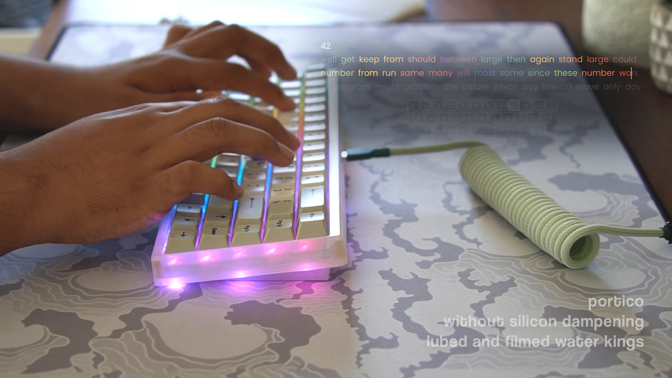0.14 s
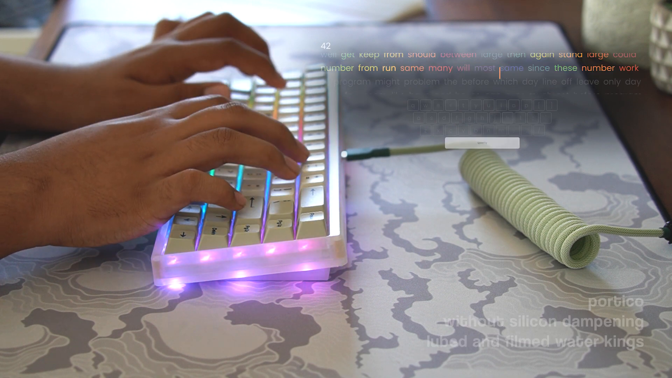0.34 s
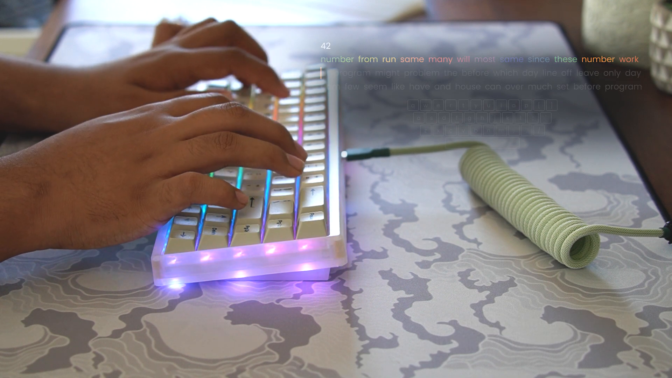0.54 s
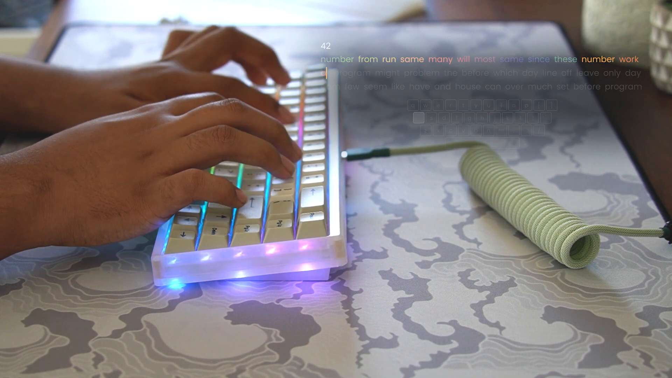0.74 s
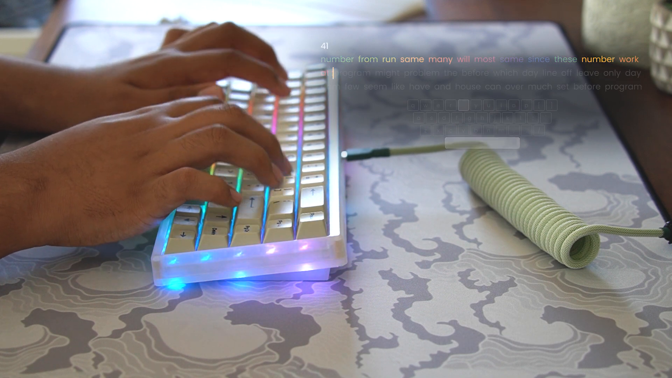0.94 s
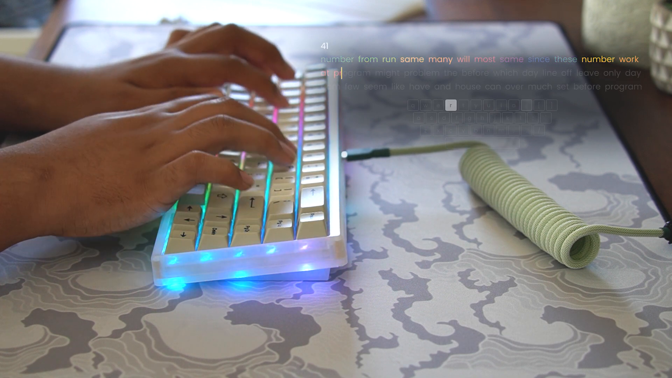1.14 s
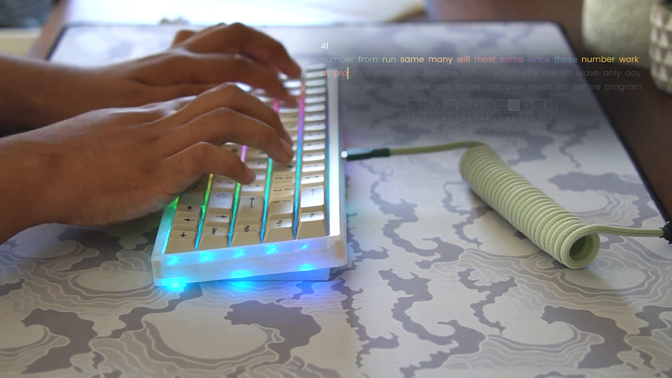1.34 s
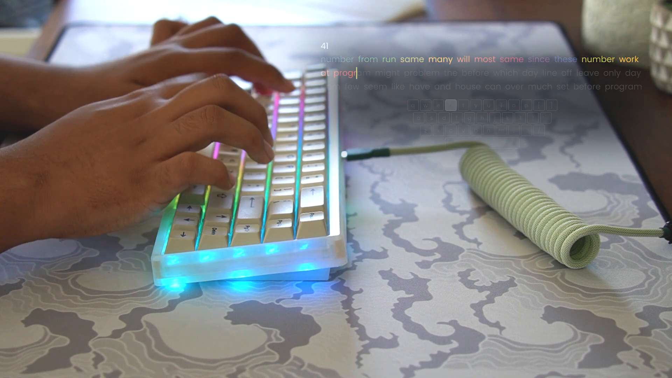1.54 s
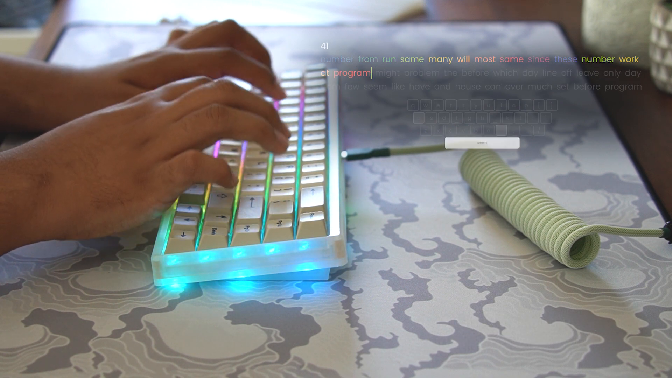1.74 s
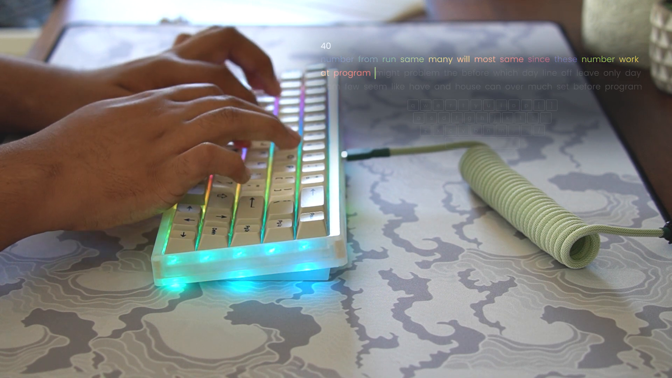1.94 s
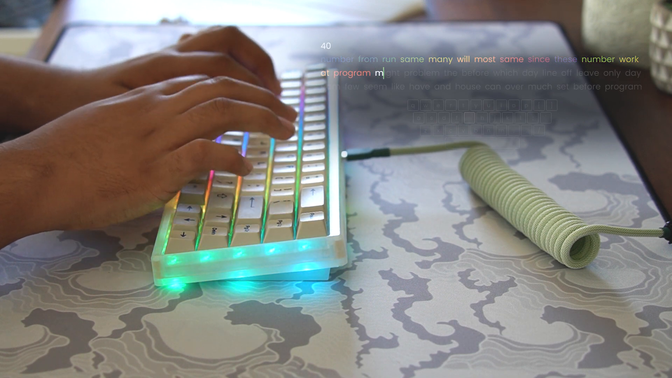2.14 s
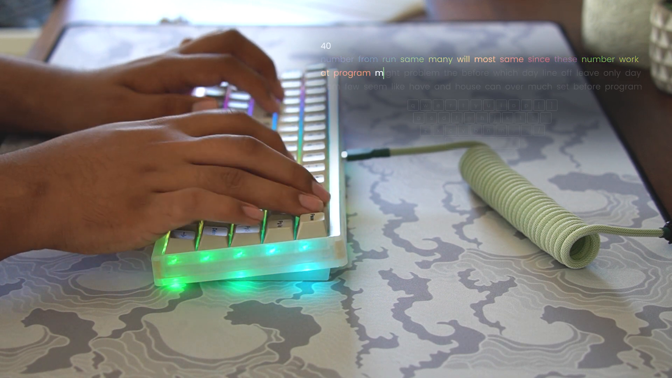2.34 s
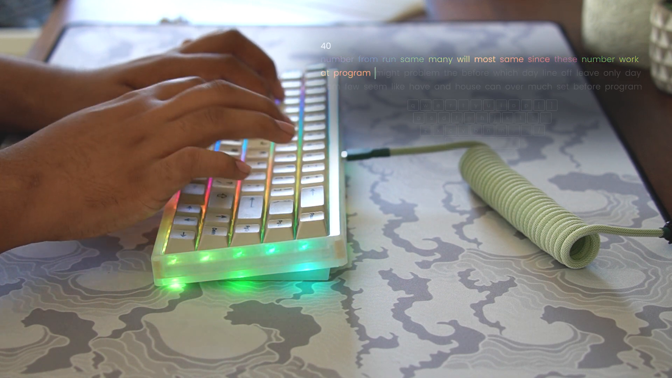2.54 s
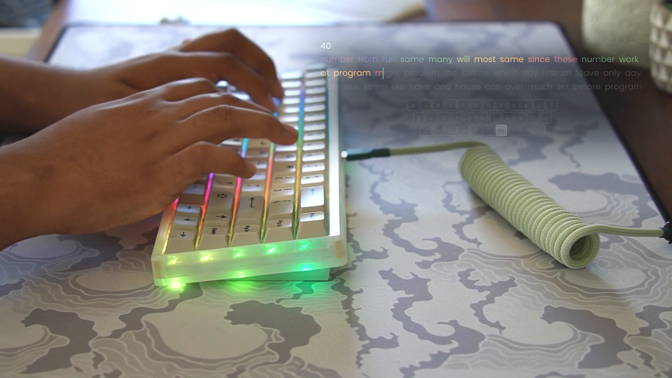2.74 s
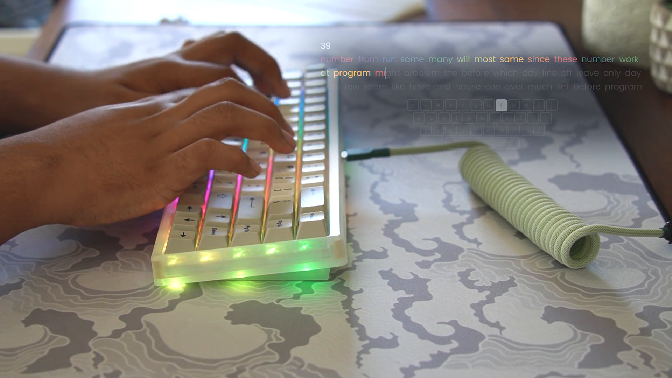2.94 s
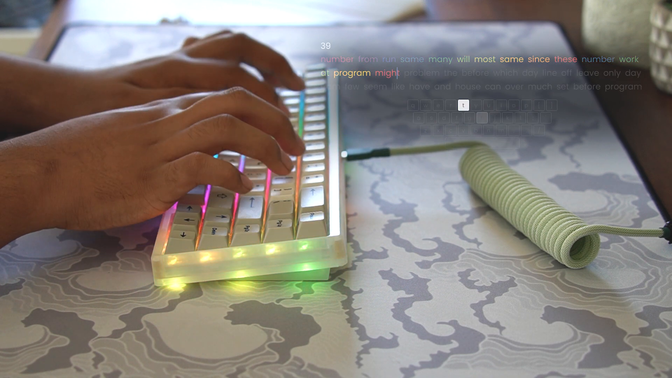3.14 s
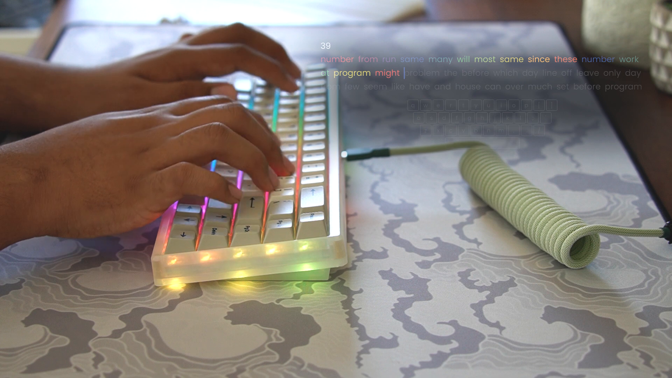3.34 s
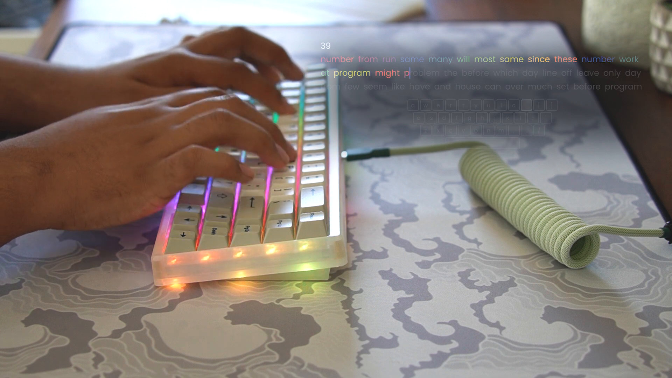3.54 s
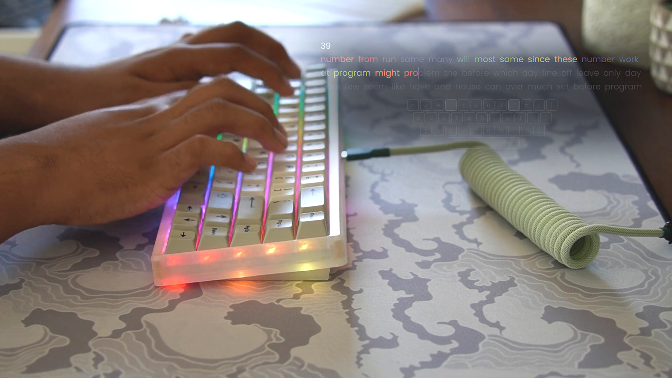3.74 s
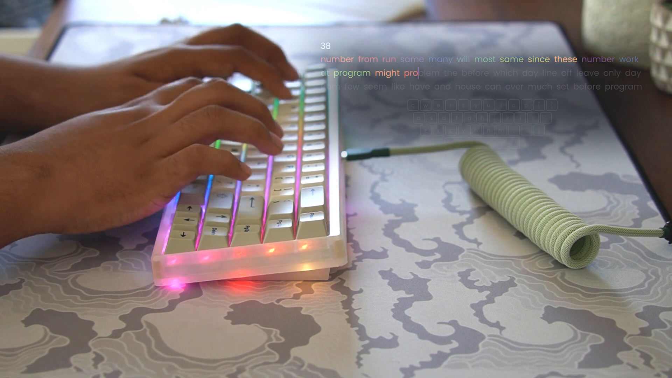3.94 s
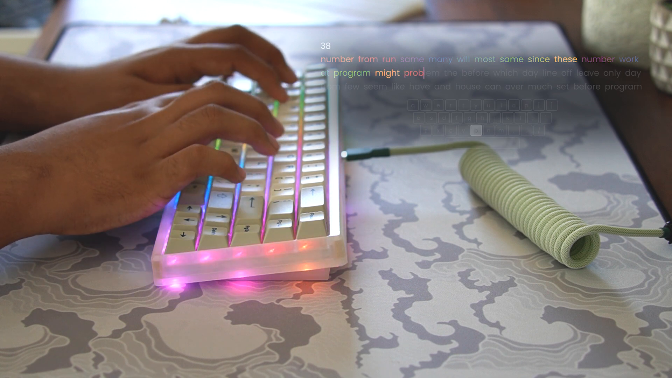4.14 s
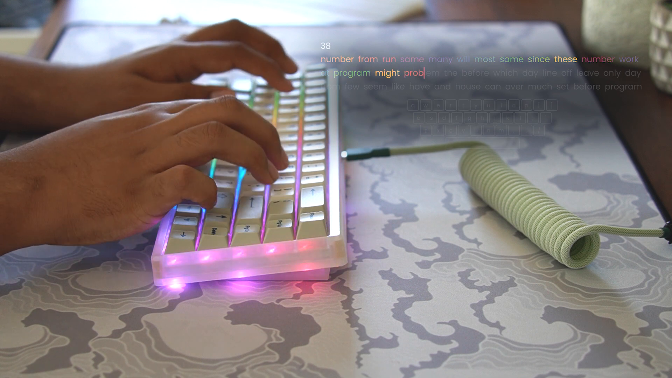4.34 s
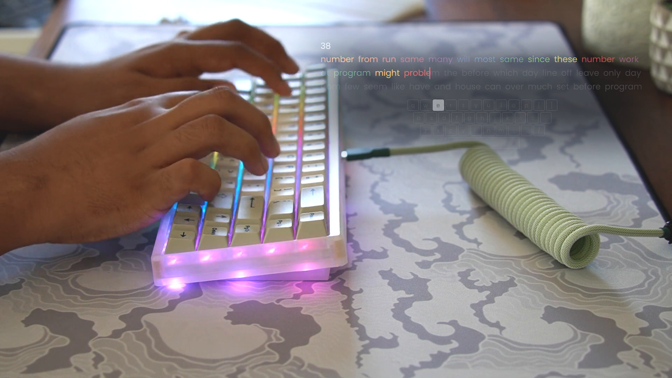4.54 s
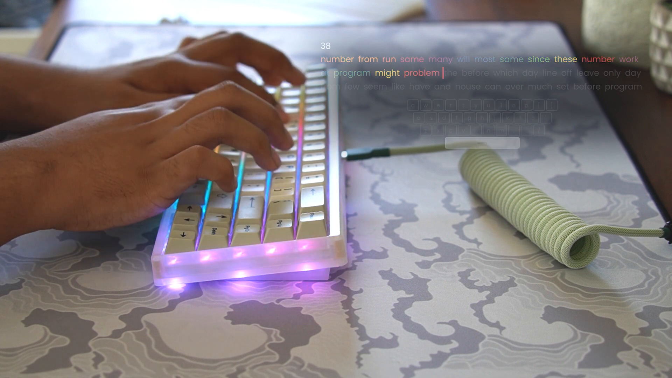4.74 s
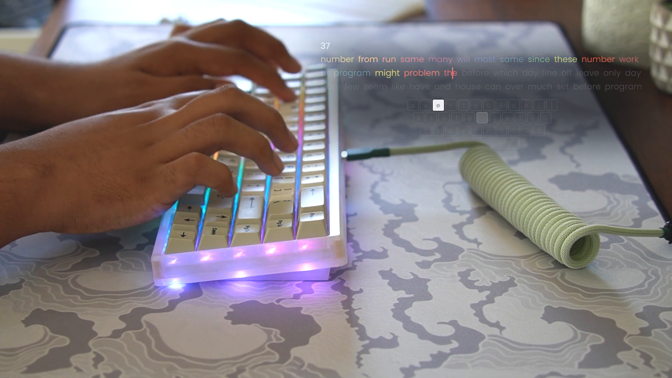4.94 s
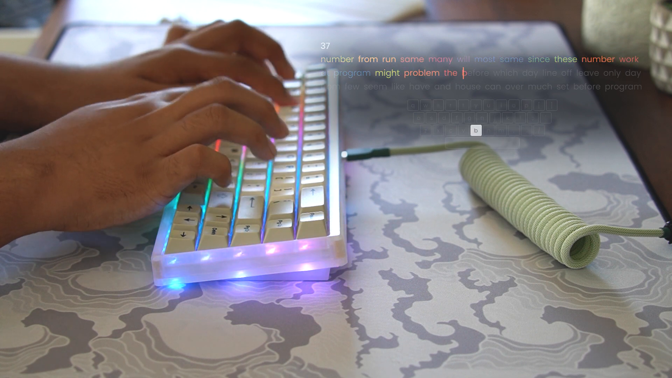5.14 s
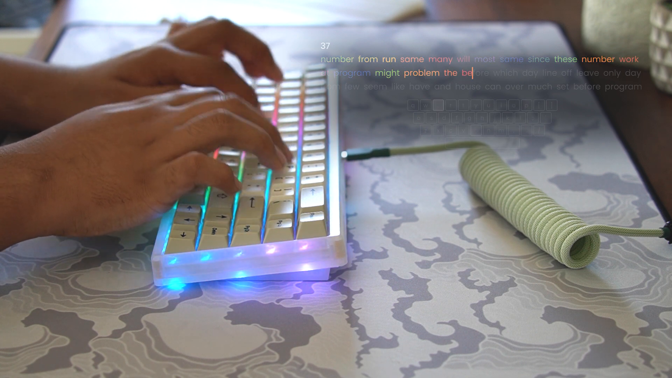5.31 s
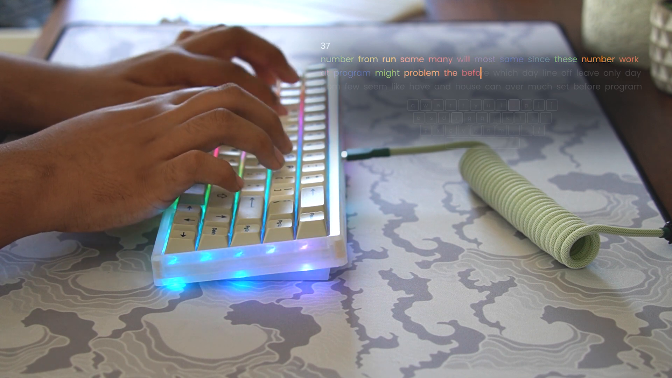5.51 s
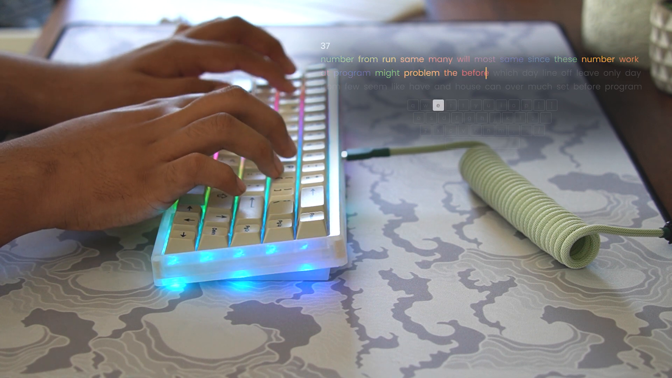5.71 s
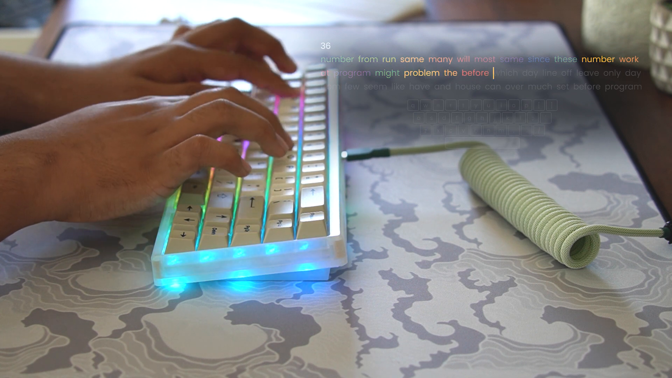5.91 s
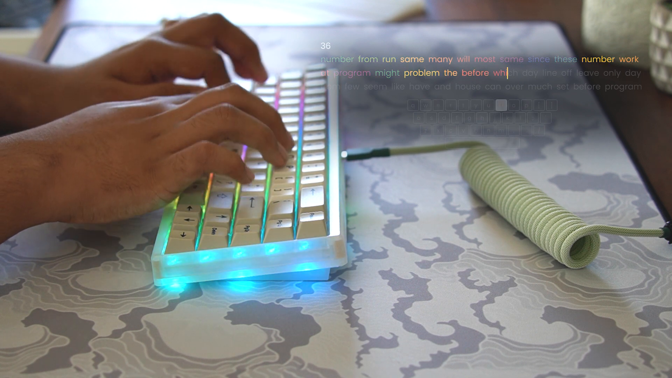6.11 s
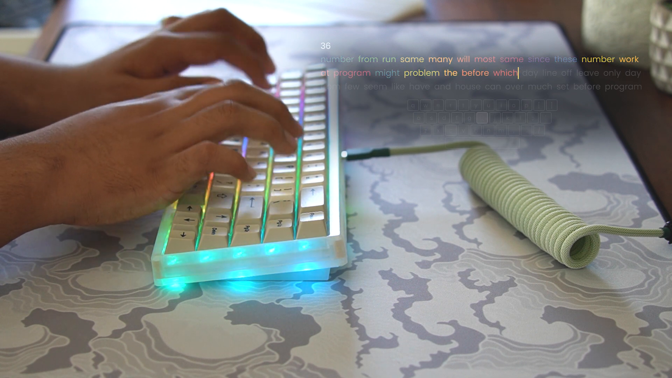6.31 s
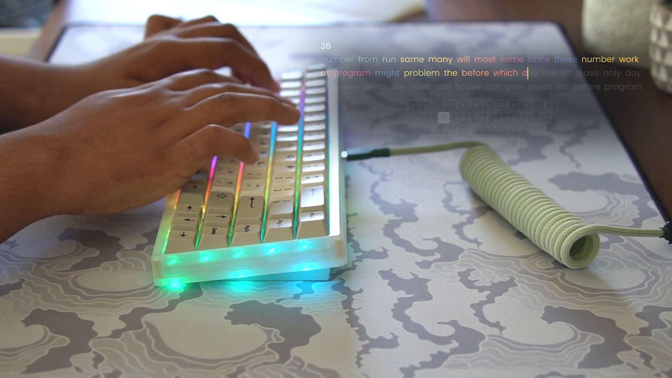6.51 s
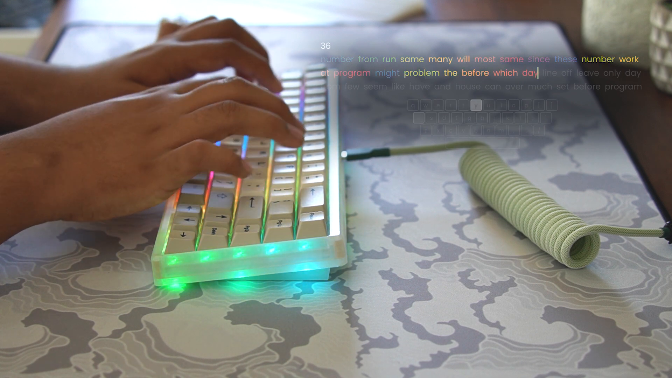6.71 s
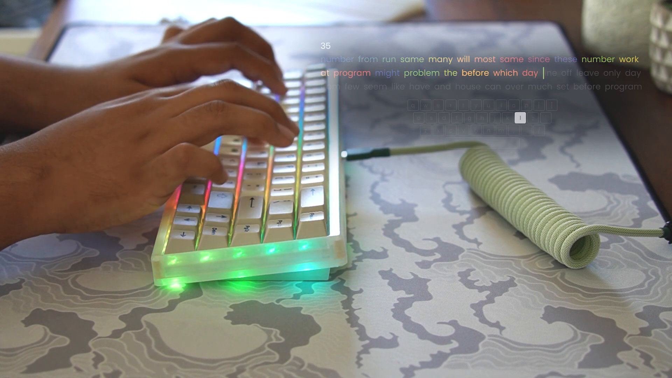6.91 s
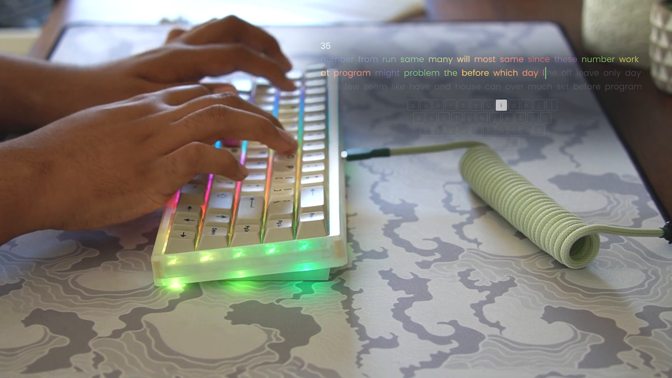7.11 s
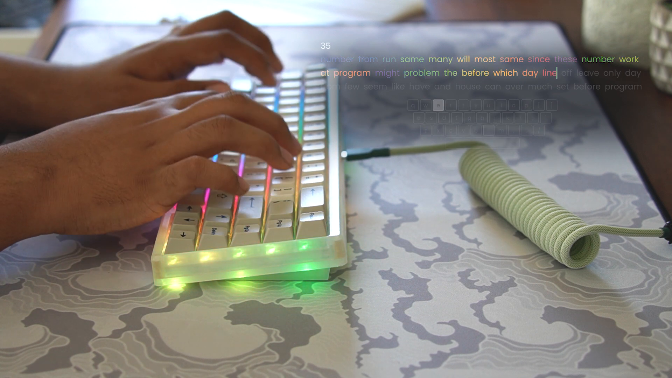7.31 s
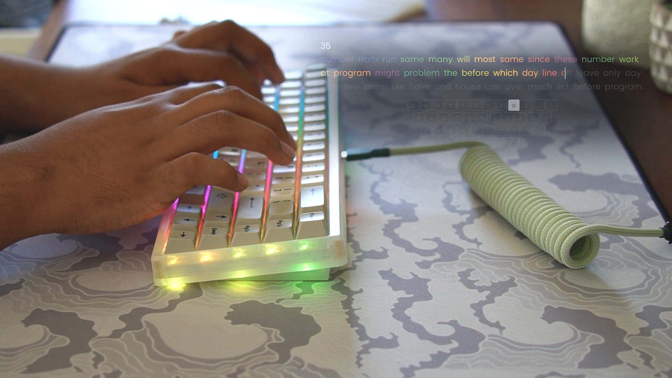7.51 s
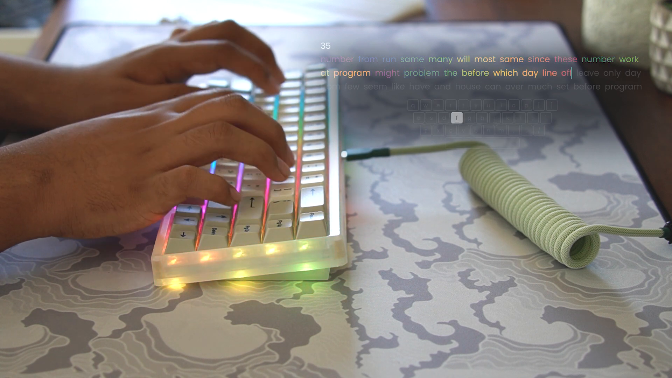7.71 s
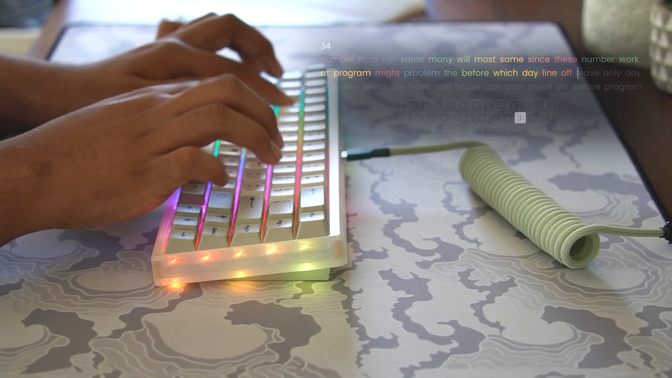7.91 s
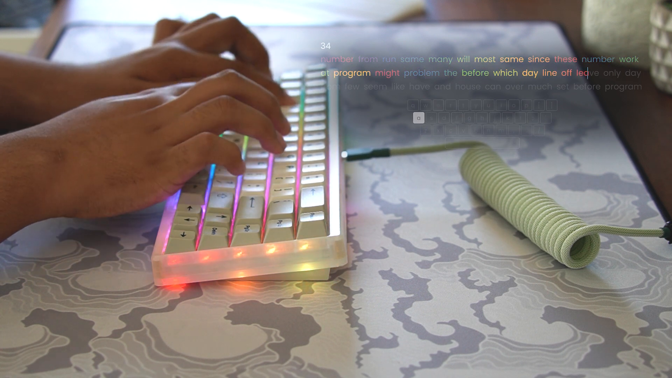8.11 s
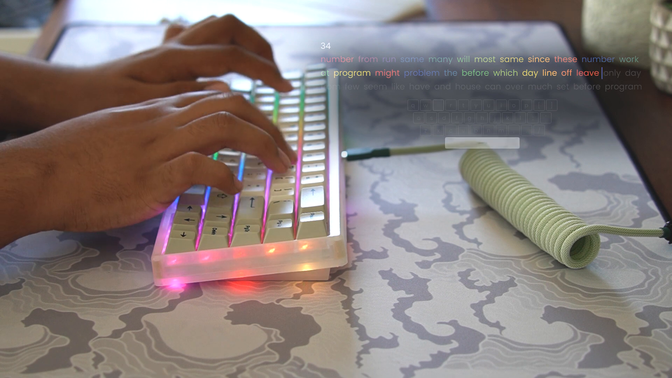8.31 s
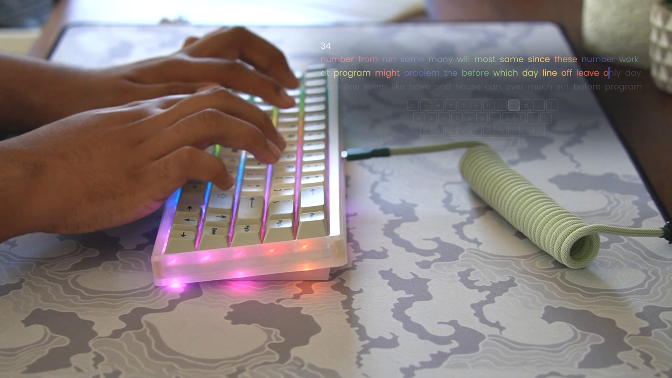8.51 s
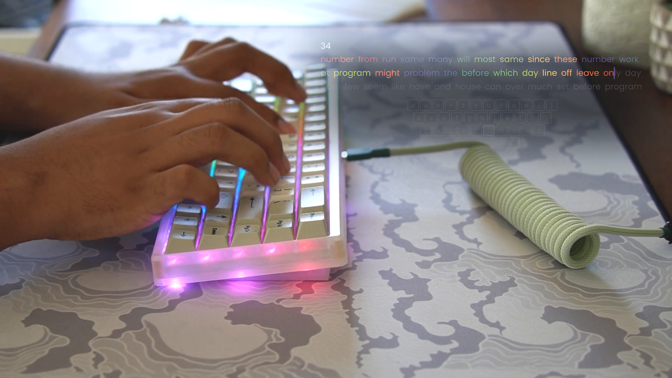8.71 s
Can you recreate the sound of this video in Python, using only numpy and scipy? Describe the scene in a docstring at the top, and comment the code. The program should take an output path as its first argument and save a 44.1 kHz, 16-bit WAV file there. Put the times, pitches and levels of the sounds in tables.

```python
"""Fast typing on a mechanical keyboard with a hollow plastic case, heard up close.
Keycaps clack as they bottom out and spring back, the long bar knocks lower: struck modes plus chatter.
Faint soft contacts, brushes and weak key blows alike, are short noisy scrapes through cap and stem modes.
The desk thumps under the blows; a quiet room hums, rumbles, hisses and throws back a faint echo."""
import sys
import numpy as np
from scipy import signal
from scipy.fft import rfft, irfft
from scipy.io import wavfile

SR = 44100
rng = np.random.default_rng(int(sys.argv[2]) if len(sys.argv) > 2 else 0)


def waveform_to_disk(signal):
    """Save audio, clipped to [-1, 1], as 16-bit WAV at the path in sys.argv[1]."""
    frames = np.transpose(np.atleast_2d(signal))
    scaled = np.clip(frames, -1, 1) * 32767
    samples = np.round(scaled).astype(np.int16)
    wavfile.write(sys.argv[1], SR, samples)


N = 386312

# modes of a keycap in its case: (factor on the cap pitch, width/Hz, level/dB)
CAP_MODES = [(0.402, 227, -5.5), (0.622, 730, -4.5), (0.953, 522, 7), (1.086, 340, 9), (1.251, 500, 0.14)]
# modes of stem and housing: (f/Hz, width/Hz, level/dB)
STEM_MODES = [(6616, 640, 1.5), (8500, 380, -4.5), (10260, 1130, 5.5), (12000, 5800, 1.5),
              (14700, 630, -15)]


def gain_of(db):
    """Decibels to an amplitude factor."""
    return 10 ** (np.asarray(db) / 20)


def read(points, hz):
    """Reads a spectrum on a logarithmic frequency axis."""
    f, value = np.transpose(points)
    return np.interp(np.log(hz + 1), np.log(f + 1), value)


def add(mix, s, sound):
    """Adds a sound to the mix at s seconds."""
    part = mix[round(s * SR):][:len(sound)]
    part += sound[:len(part)]


def ring(hz, width, db, contact_s, size=700):
    """Modes struck together, wider ones dying faster; contact_s sets how softly they start; peak 1."""
    t = np.arange(size)[:, None] / SR
    decay = np.exp(-np.pi * width * t)
    modes = (gain_of(db) * width * decay * np.sin(2 * np.pi * hz * t)).sum(1)
    modes *= (1 - np.exp(-t[:, 0] / contact_s)) ** 2  # the force builds up while the plastic yields
    return modes / abs(modes).max()


def chatter(sound, grit):
    """The blow, then loose plastic chattering: a fading burst of tiny irregular re-strikes; peak kept."""
    fade = np.exp(-np.arange(len(grit)) / (0.003 * SR))  # 3 ms time constant
    strikes = gain_of(-43) * grit ** 3 * fade  # cubing makes a few re-strikes stand out
    strikes[0] = 1  # the blow itself
    rattled = signal.oaconvolve(sound, strikes)
    return rattled * abs(sound).max() / abs(rattled).max()


def keys():
    """Each blow clacks at its own pitch, with a thin stem and housing tick that varies from blow to blow."""
    # keycap blows, down and up: (t/s, level/dB, cap pitch f/Hz, stem tick relative to the clack level/dB)
    key_blows = [(0.0639, -28.5, 3000, -22), (0.073, -35, 2820, -13), (0.222, -35.5, 2660, -21),
                 (0.2387, -27, 2890, -16.5), (0.6457, -22, 2880, -30.5), (0.725, -32, 2380, -21),
                 (0.8173, -21, 2800, -16), (0.8838, -27, 2820, -15.5), (1.0247, -28, 2620, -12),
                 (1.107, -30, 2500, -13), (1.115, -26.5, 3260, -3), (1.2051, -31, 2900, -14),
                 (1.2898, -38.5, 2640, -33), (1.455, -24.5, 2870, -11), (1.4583, -34, 2900, -4),
                 (1.5352, -32, 2770, -15), (1.618, -22.5, 2720, -15.5), (1.6295, -38, 2600, -8),
                 (1.6438, -25.5, 3000, -4), (1.701, -37.5, 2430, -3.5), (1.736, -35.5, 2860, -18),
                 (1.877, -37.5, 2830, -3), (2.003, -35.5, 2440, -15), (2.0716, -27, 2900, -11),
                 (2.423, -36.5, 2670, -14), (2.4979, -29, 2430, -20.5), (2.677, -29, 3040, -6.5),
                 (2.778, -25, 2890, -17.5), (2.903, -24, 2840, -15), (2.969, -26, 2570, -17),
                 (3.0349, -23, 2580, -9.5), (3.1209, -31, 3040, -16), (3.1397, -21.5, 2680, -4.5),
                 (3.216, -33.5, 2900, -11), (3.42, -30, 2630, -14), (3.4974, -32, 2700, -14.5),
                 (3.7036, -33, 2720, -20), (3.7096, -32, 2580, -9.5), (4.085, -31, 2930, -8),
                 (4.3852, -42, 2760, -10), (4.455, -18, 2850, -8), (4.5087, -30, 2690, -8),
                 (4.5762, -20.5, 2970, -5), (4.5824, -29, 2600, -12), (4.6483, -32, 2940, -16),
                 (4.7792, -27.5, 2800, -16), (4.8512, -29, 2670, -12), (4.8546, -21, 2850, -6.5),
                 (4.9309, -21.5, 2870, -20), (4.951, -30, 2700, -4), (5.0253, -34.5, 2450, -9),
                 (5.1444, -25.5, 2860, -10.5), (5.2012, -26, 2590, -4), (5.271, -22, 2710, -8.5),
                 (5.3772, -22, 2920, -7.5), (5.3979, -24.5, 2730, -13), (5.4437, -21, 2950, -4),
                 (5.4826, -35, 2760, -15), (5.5341, -29.5, 3140, -5), (5.6057, -37.5, 2550, -14),
                 (5.7011, -27, 2620, -7), (5.776, -25.5, 2760, -3), (5.9291, -22, 2980, -10),
                 (6.0194, -26.5, 2760, -22), (6.0334, -32, 2710, 3), (6.047, -22, 2940, -26),
                 (6.1464, -16, 3100, -10.5), (6.1832, -35, 2750, -14), (6.234, -35, 2700, -12.5),
                 (6.4269, -28.5, 2830, -6.5), (6.5113, -30.5, 2700, -16), (6.569, -17.5, 2780, -13),
                 (6.627, -23.5, 2690, -15), (6.6657, -39, 2550, -11), (6.697, -36, 2770, -12),
                 (6.8947, -25, 2820, -11.5), (6.976, -27, 2860, -5.5), (7.087, -25, 2900, -13.5),
                 (7.1802, -18, 3140, -21.5), (7.2454, -35, 2650, -10), (7.2682, -27, 2880, -25),
                 (7.321, -27, 2500, -4), (7.46, -26.5, 2600, -16), (7.5291, -24, 3090, -9.5),
                 (7.536, -33, 2850, -14), (7.598, -23, 3000, -2), (7.6629, -22.5, 3090, -3.5),
                 (7.7344, -22, 2980, -4.5), (7.883, -24.5, 2780, -6), (7.9282, -26, 2580, -10),
                 (7.975, -29, 2870, -9), (8.0697, -29.5, 2600, -38), (8.1237, -17, 2970, -11.5),
                 (8.1562, -37, 2560, -31), (8.166, -26, 2640, -9.5), (8.1964, -27.5, 2890, -11),
                 (8.2577, -28.5, 2470, -3.5), (8.402, -26.5, 2980, -12), (8.487, -32.5, 2670, -13.5),
                 (8.574, -27.5, 2820, -22), (8.621, -27, 2860, -20.5), (8.7263, -29.5, 2910, -16)]
    cap_spread, cap_spread_db = 0.015, 2.2  # blow-to-blow scatter of the cap modes: share of pitch, dB
    stem_spread, stem_spread_db = 0.03, 3.5  # the same for the stem modes
    cap_contact_s, stem_contact_s = 2 / SR, 0.00016
    case_cut_hz = 580  # the small caps radiate little below this

    factor, width, db = np.transpose(CAP_MODES)
    tick_hz, tick_width, tick_db = np.transpose(STEM_MODES)
    factor = factor * (-1) ** np.arange(len(CAP_MODES))  # neighbouring modes swing in opposite phase
    chance = rng.standard_normal((len(key_blows), 4, len(CAP_MODES)))
    grits = rng.standard_normal((len(key_blows), 200))
    out = np.zeros(N)
    for (s, level_db, cap_hz, stem_db), c, grit in zip(key_blows, chance, grits):
        clack_hz = cap_hz * factor * (1 + cap_spread * c[0])
        clack = ring(clack_hz, width, db + cap_spread_db * c[1], cap_contact_s)
        scattered_hz = tick_hz * (1 + stem_spread * c[2])
        tick = ring(scattered_hz, tick_width, tick_db + stem_spread_db * c[3], stem_contact_s)
        blow = clack + gain_of(stem_db) * tick
        add(out, s, -gain_of(level_db) * chatter(blow, grit))
    return signal.sosfilt(signal.butter(3, case_cut_hz, "high", fs=SR, output="sos"), out)


def bar():
    """The long bar rings the same lower modes at every blow, in slightly varying balance."""
    # long bar blows: (t/s, level/dB)
    bar_blows = [(0.3601, -39.5), (0.889, -31), (1.7397, -25), (3.1987, -26), (4.706, -22.5), (5.0131, -22),
                 (5.7786, -21), (6.3076, -19), (6.73, -19.5), (7.3293, -21.5), (7.738, -23), (8.263, -21.5)]
    # modes of the long bar: (f/Hz, width/Hz, level/dB)
    bar_modes = [(313, 74, -2.5), (704, 120, -15), (1275, 133, -3), (1766, 420, 1.5), (2126, 143, 8),
                 (2640, 320, -12), (3026, 210, 0.5), (3150, 83, -15), (4040, 58, -5.5), (6830, 460, -15.5),
                 (11150, 1200, -18)]
    spread_db = 1.5  # scatter of the mode levels

    hz, width, db = np.transpose(bar_modes)
    chance = rng.standard_normal((len(bar_blows), len(hz)))
    grits = rng.standard_normal((len(bar_blows), 200))
    out = np.zeros(N)
    for (s, level_db), c, grit in zip(bar_blows, chance, grits):
        knock = ring(hz, width, db + spread_db * c, contact_s=0.00013, size=2000)
        add(out, s, gain_of(level_db) * chatter(knock, grit))
    return out


def soft_contacts():
    """Short noisy scrapes ring cap and stem modes softly: faint contacts and a random scatter of specks."""
    # faint soft contacts, brushes and weak key blows alike: (t/s, scrape level/dB)
    contacts = [(0.171, -64.5), (0.288, -59), (0.465, -61.5), (1.8375, -62.5), (2.131, -66), (2.657, -64),
                (3.292, -63), (3.634, -58.5), (3.9429, -63.5), (4.225, -61), (4.36, -65.5), (4.567, -56),
                (4.668, -63), (4.762, -61.5), (4.7954, -64), (4.979, -56), (5.186, -61), (5.218, -54.5),
                (5.363, -56), (5.515, -63), (5.87, -60.5), (6.0905, -57.5), (6.134, -54), (6.411, -59.5),
                (6.8243, -57), (7.2966, -54), (7.516, -51.5), (7.6436, -60), (7.8456, -56.5)]
    t = np.arange(300) / SR
    scrape = t * np.exp(-t / 0.00087)
    scrape /= scrape.max()
    drive = np.zeros(N)
    for (s, level_db), grit in zip(contacts, rng.standard_normal((len(contacts), len(t)))):
        add(drive, s - 0.001, gain_of(level_db) * grit * scrape)  # starts 1 ms ahead of its listed time
    specks = rng.random(N) < 40 / SR  # about 40 a second
    drive += specks * gain_of(-67 + 3.9 * rng.standard_normal(N))

    factor, width, db = np.transpose(CAP_MODES)
    cap = ring(3000 * factor, width, db, contact_s=0.000081)
    stem = ring(*np.transpose(STEM_MODES), contact_s=0.0013)
    return signal.oaconvolve(drive, cap + gain_of(-12.5) * stem)[:N]


def desk(blows):
    """Each blow pushes the desk, which answers with a slow, low swing and a short knock."""
    t = np.arange(6000) / SR
    swing = t * np.exp(-t / 0.015) * np.sin(2 * np.pi * 45 * t)
    knock = t * np.exp(-t / 0.0086) * np.sin(2 * np.pi * 100 * t)
    thump = gain_of(-62.5) * swing / swing.max() + gain_of(-63.5) * knock / knock.max()
    return -signal.oaconvolve(abs(blows), thump)[:N]  # the push is one-sided


def echoes(board):
    """A near wall answers after 12 ms; a lumpy tail follows; both change from moment to moment."""
    t = np.arange(9000) / SR
    fade = gain_of(-62.5 - 60 * t / 0.25)  # 60 dB in a quarter second
    tails = fade * rng.standard_normal((3, len(t))) ** 3 * (t > 0.003)  # cubed noise is lumpy
    tails[:, round(0.012 * SR)] += gain_of(-33.5)  # the wall
    turn = np.arange(N) / SR * 9  # rad, 9 rad/s
    out = np.zeros(N)
    for k, tail in enumerate(tails):
        weight = np.cos(turn + k * np.pi / len(tails))  # blends the tails in turn
        out += signal.oaconvolve(board * weight, tail)[:N]
    return out


def room():
    """Rumble and hiss from shaped noise, with wavering tones; only a little differs between channels."""
    # noise spectrum, relative: (f/Hz, level/dB)
    noise_spectrum = [(8, 7.5), (18, -6), (36, -2.5), (64, -10.5), (82, -24.5), (184, -26), (372, -32.5),
                      (1790, -40.5), (3060, -45), (9670, -47.5), (15200, -49.5), (16500, -63)]
    # side noise relative to the shared middle: (f/Hz, level/dB)
    side_spectrum = [(40, -44), (300, -17.5), (2500, -21), (6000, -8.5)]
    # wavering tones: (f/Hz, rms level/dB)
    hum_tones = [(180.5, -74), (4288, -85.5)]
    mid_db = -48  # rms of the shared noise

    hz = np.fft.rfftfreq(N, 1 / SR)
    mid, side = rfft(rng.standard_normal((2, N))) * gain_of(read(noise_spectrum, hz))
    mid, side = irfft(mid, N), irfft(side * gain_of(read(side_spectrum, hz)), N)
    level = gain_of(mid_db) / mid.std()
    wander = np.cumsum(rng.standard_normal((len(hum_tones), N)), 1) * 0.0206  # phase drift, rad
    t = np.arange(N) / SR
    tones = np.zeros(N)
    for (f, db), w in zip(hum_tones, wander):
        tones += np.sqrt(2) * gain_of(db) * np.sin(2 * np.pi * f * t + w)
    return level * np.array([mid + side, mid - side]) + tones


def scene():
    """Keyboard, echo and desk sit in the middle of the stereo room."""
    blows = keys() + bar()
    board = blows + soft_contacts()
    return board + echoes(board) + desk(blows) + room()


def record(dry):
    """A steep linear-phase low-pass limits the band to 16.3 kHz."""
    low_pass = signal.firwin(255, 16300, window=("kaiser", 9), fs=SR)
    return signal.oaconvolve(dry, low_pass[None], "same")


dry = scene()
out = record(dry)
waveform_to_disk(out)
```